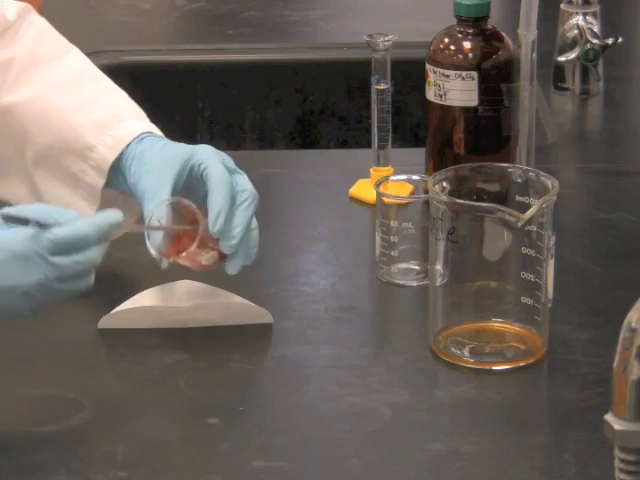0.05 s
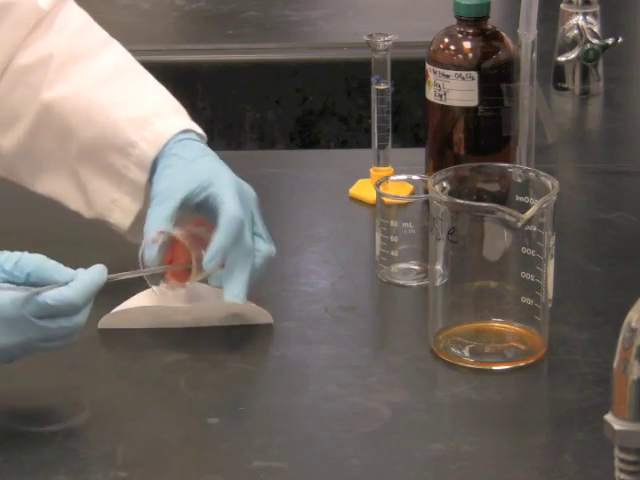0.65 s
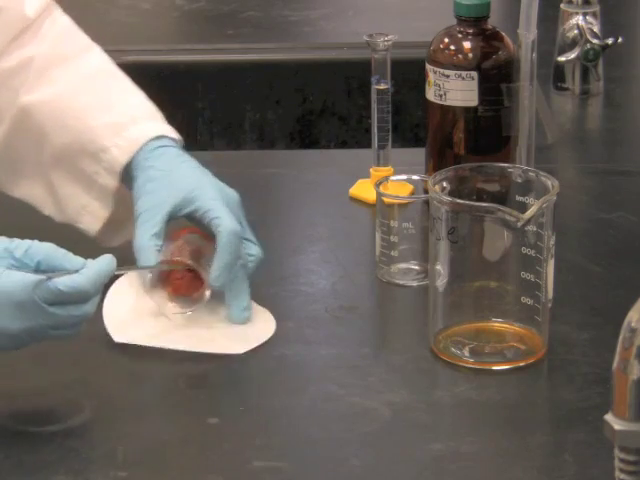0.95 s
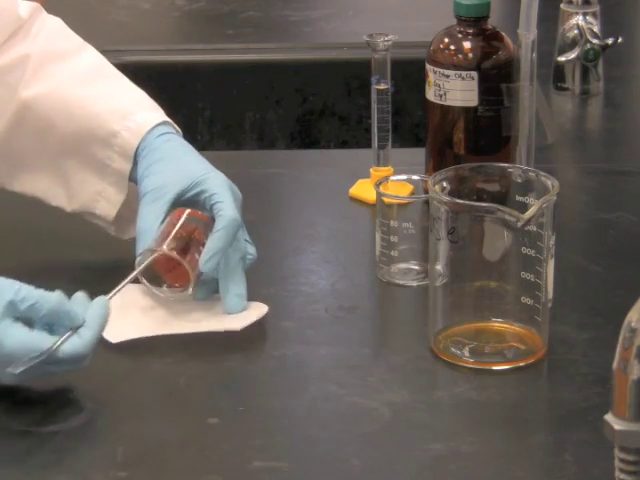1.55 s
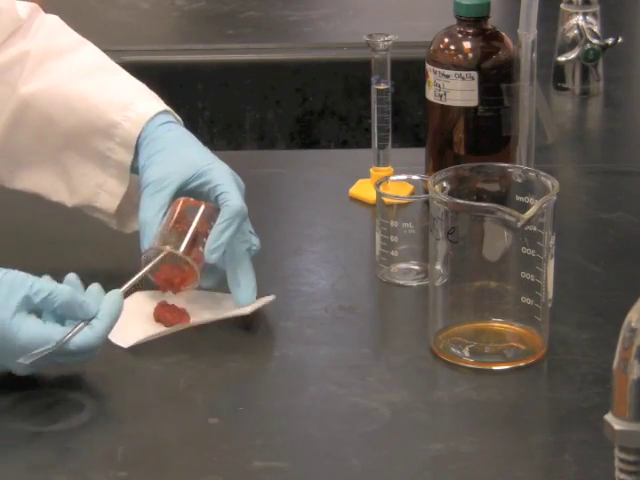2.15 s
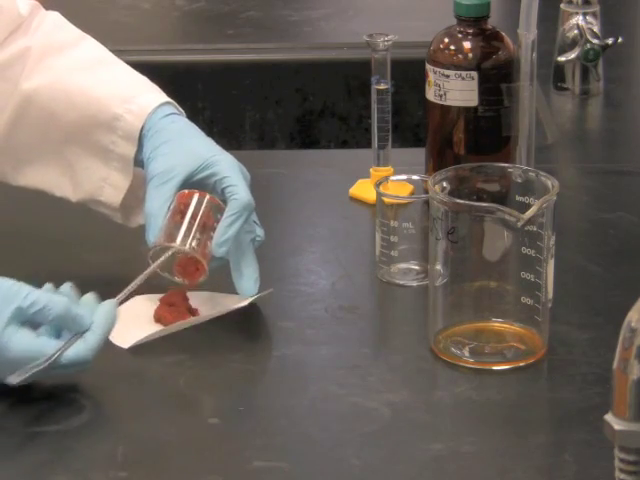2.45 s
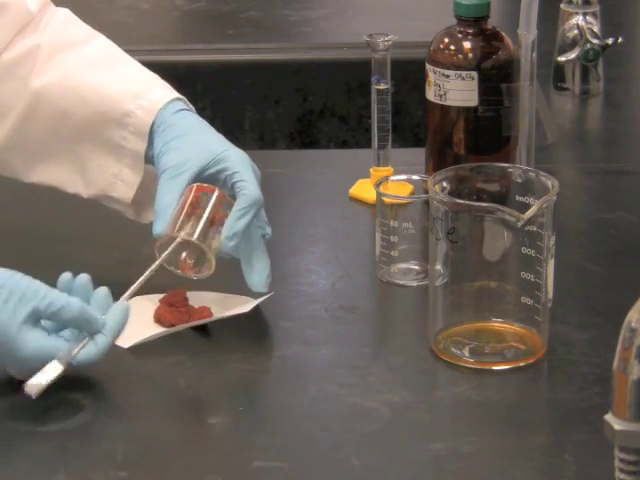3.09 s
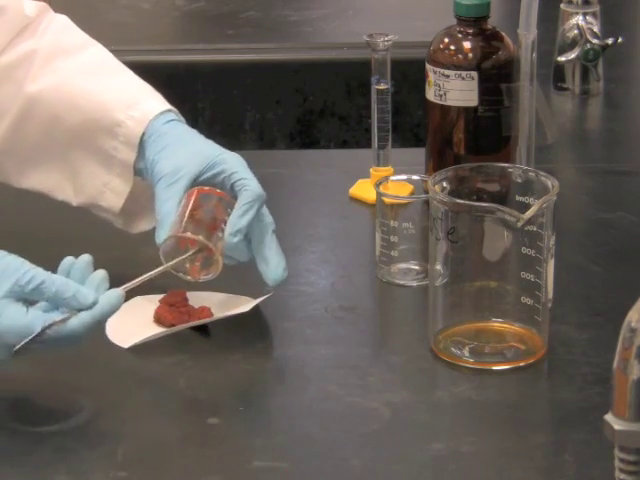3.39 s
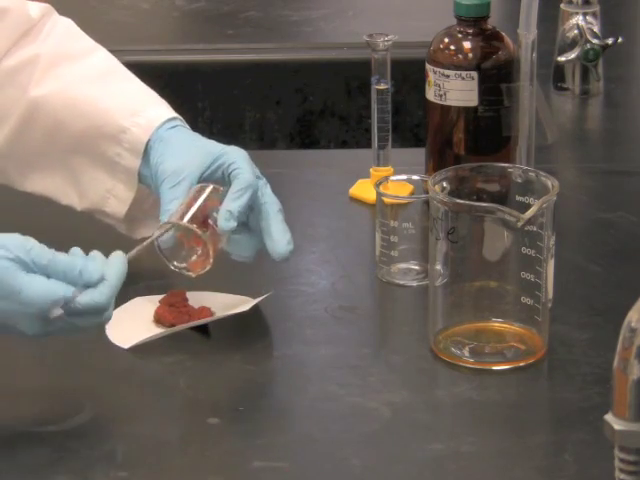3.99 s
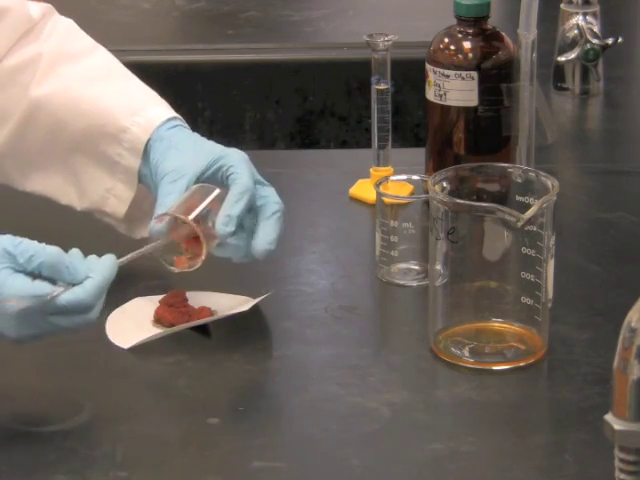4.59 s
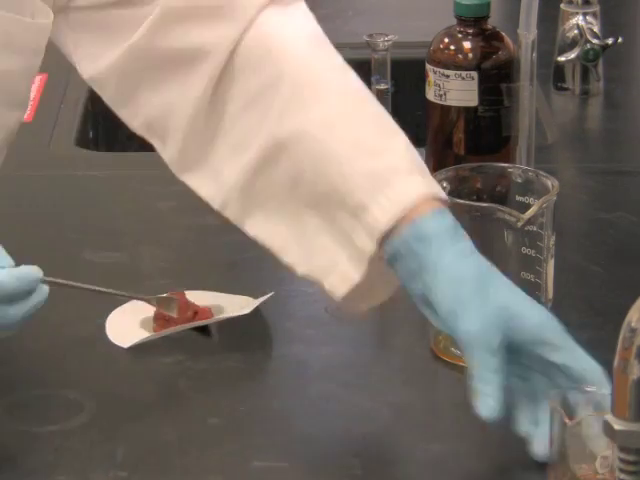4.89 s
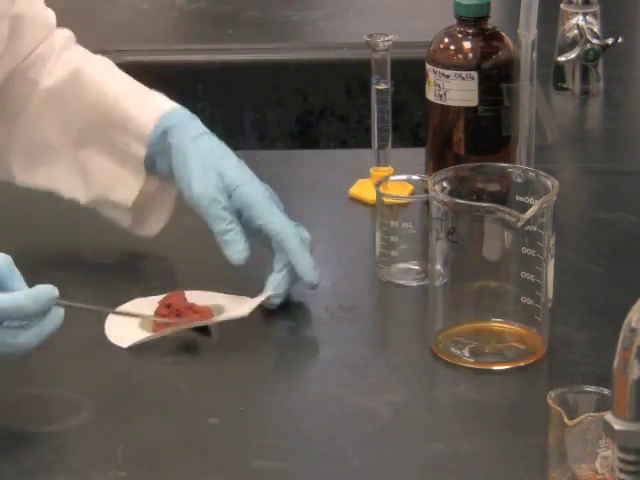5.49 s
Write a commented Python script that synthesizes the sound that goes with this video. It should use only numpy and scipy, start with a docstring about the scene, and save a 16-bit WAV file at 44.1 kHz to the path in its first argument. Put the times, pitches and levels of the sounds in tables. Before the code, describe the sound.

A steel spatula ticks and clinks against a hand-held glass beaker, close by, in a slightly echoing lab. The taps come singly and in quick pairs, high and quickly damped, with barely audible smears of paste and paper. After the sharpest clink, everything dips briefly to silence, then the beaker rings on the bench and fades. Ventilation rumbles and hums underneath throughout.

```python
"""A ventilated lab, where a steel spatula scoops paste from a small glass beaker held in a gloved hand.
Each impact excites the modes of blade and glass, which the glove damps; stick-slip friction squeaks,
and paste and weighing paper rustle faintly. The walls reverberate, and turbulent air rumbles throughout.
Near the end the level dips briefly to silence and returns on the free ring of the beaker on the bench."""
import sys
import numpy as np
from scipy import signal
from scipy.fft import rfft, irfft, next_fast_len
from scipy.io import wavfile
from scipy.ndimage import uniform_filter1d

SR = 44100
rng = np.random.default_rng(int(sys.argv[2]) if len(sys.argv) > 2 else 0)


def log_audio(samples):
    """Write samples as a 16-bit WAV file to the path given in sys.argv[1]."""
    # one column per channel
    frames = np.atleast_2d(samples).T
    # limit to full scale, then quantise
    limited = np.clip(frames, -1, 1)
    pcm = np.round(limited * 32767).astype(np.int16)
    wavfile.write(sys.argv[1], SR, pcm)


N = 244314
TIME = np.arange(N) / SR
SIDES = np.array([[1], [-1]])   # left, right
SILENT_S = 4.893   # the bottom of the dip in level


def clinks(size=16384, rise_s=0.00035, blade_build_s=0.00092):
    """Impact excitation: each touch cracks, rings blade and beaker, and favours pings set by its place."""
    # The glass rings most when touched at its rim; grip and paste shift its pitch and damp it.
    # Each row: start in seconds, crack level in dB, its extra dB at 1.5-2.5 kHz, from 13 kHz up and at
    # 4-7 kHz, blade and glass gains in dB, glass pitch in Hz, factor on the glass's ring time, and pings,
    # each with frequency in Hz, level in dB and left-right difference in dB.
    touches = [ (0.135, -43, 0, -3, 4, -47, -62, 3190, 1.0, [(7400, -46, 0), (14900, -51, 0)]),
               (1.0061, -34, 3, 1, -10, -47, -37, 3190, 0.75, [(3950, -37, 2), (8520, -30, -11),
               (11560, -31, 0), (13000, -29, -1), (15300, -35, 0)]),
               (1.03, -43, 0, 1, -6, -47, -45, 3180, 1.0, [(8560, -38, -4), (11600, -43, 0),
               (13700, -44, 1)]), (1.036, -48, 0, 0, -3, -55, -48, 3120, 1.0, [(13000, -48, 0)]),
               (1.5499, -31.5, 5, 3, -7, -48, -32.5, 3200, 0.62, [(7450, -40, 0), (8400, -38, 0),
               (9700, -37, 1), (12900, -34, 2), (13600, -34, 2), (14550, -34, 2)]),
               (1.677, -42, 0, 0, -4, -52, -45, 3140, 0.8, [(7300, -41, 0), (14500, -46, 0)]),
               (1.691, -30.5, 5, -2, -6, -36, -31, 3104, 0.98, [(3800, -45, 0), (8310, -29, -4),
               (9750, -32, -3), (11450, -36, 0), (13500, -34, 0), (15600, -36, 0)]),
               (1.9989, -24.5, 3, 4, -7, -43, -26.5, 3195, 1.08, [(5530, -27.5, 4), (8520, -24.5, -10),
               (11540, -29, 2), (13620, -25, 3), (14400, -28, 2), (15450, -30, 2)]),
               (3.0046, -34.5, 0, -4, -8, -34.5, -47, 3250, 1.0, [(6650, -39, 0), (7740, -34, 0),
               (8880, -32, 0), (9930, -25.5, 4), (10060, -32, 0), (11500, -29, -1), (13400, -32, 1),
               (15500, -38, 0)]), (3.6213, -39, 0, -8, -6, -30.5, -53, 3190, 1.0, [(4950, -47, 0),
               (8930, -24.5, -3), (9620, -35, -1), (14200, -45, 3)]),
               (3.6904, -32, 5, 6.5, -7, -53, -48, 3260, 1.0, [(5350, -43, 0), (6600, -38, 0),
               (9400, -38, -1), (13900, -31, 3), (14900, -33, 2)]),
               (4.3316, -32, -4, -3, -10, -32, -60, 3190, 1.0, [(5080, -37, 0), (6580, -31, 0),
               (7770, -29, -2), (9000, -33, 0), (10200, -24.5, 3), (11400, -26, -1), (14700, -29, 2)]),
               (4.3842, -27.5, -2, 1, -8, -40, -49, 3200, 1.0, [(5400, -22.5, -1), (9080, -26, 0),
               (13100, -30, 5), (14200, -31, 5)]),
               (4.7651, -22, -3, -3, -12, -20, -52, 3200, 1.0, [(5270, -25, 0), (5930, -26, 0),
               (6540, -24, 0), (7500, -23, -5), (7850, -23, -4), (9030, -25, 0), (9850, -21.5, 2),
               (10170, -17, 4), (11200, -19, 2), (14550, -27, 2), (15350, -30, 2)])]
    # Modes of the hand-held blade. Each row: frequency in Hz, relative level in dB, T60 in seconds.
    blade_modes = [(1369, 4, 0.066), (1285, -3, 0.046), (1246, -13, 0.05), (1030, -11, 0.035),
                   (5220, -26, 0.09), (5960, -27, .04), (8400, -22, 0.02), (8940, -15, 0.016)]
    # Modes of the gloved beaker. Each row: nominal frequency in Hz, relative dB, nominal T60 in seconds.
    glass_modes = [(3200, 3.5, 0.046), (2970, -24, 0.016), (3490, -4.5, 0.029), (3890, 1.5, 0.011),
                   (4260, -3, 0.013), (5400, -17, 0.069), (8640, -16, 0.076), (8200, -21, 0.023),
                   (11650, -12, 0.029), (13440, -10, .03), (14525, -16, .022), (15400, -18, .03)]
    out, t = np.zeros((2, N)), TIME[:size]
    for s, crack_db, clack_db, top_db, mid_db, steel_db, glass_db, glass_hz, freedom, favoured in touches:
        contact = from_db(crack_db) * crack(clack_db, mid_db, top_db, size)
        swing_up = 1 - np.exp(-t / blade_build_s)   # slow bending modes take a moment to build
        steel = from_db(steel_db) * ring(blade_modes, size, port_phase=0.3) * swing_up
        gripped = [(hz * glass_hz / glass_modes[0][0], db, t60 * freedom) for hz, db, t60 in glass_modes]
        glass = from_db(glass_db) * ring(gripped, size, port_phase=0.37)
        pings = sum(ping(hz, db, size) * panned(pan_db) for hz, db, pan_db in favoured)
        add(out, s, (contact + steel + glass + pings) * (1 - np.exp(-t / rise_s)))
    return out


def crack(clack_db, mid_db, top_db, size, t60=0.014, centred=0.34):
    """A brief hard contact has a broad spectrum, comb-filtered by interference with early reflections."""
    # Spectrum of the contact. Each row: frequency in Hz, relative level in dB.
    spectrum = [(900, -11), (2500, -8), (4300, 3), (6500, 7), (10000, -4.5), (14500, 2), (15400, -1),
                (16000, -12)]
    # Reflections off bench and glassware. Each row: mean delay in seconds, gain in dB.
    reflections = [(.0012, -4.5), (.003, -6.5)]
    shelves = [(700, 0), (1500, clack_db), (2500, clack_db), (4000, mid_db), (7000, mid_db),
               (8500, 0), (11500, 0), (13000, top_db)]
    burst = noise(lambda hz: from_db(at_hz(spectrum, hz) + at_hz(shelves, hz)), size)
    burst = rms_one(burst + centred * burst[::-1]) * decay(TIME[:size], t60)
    # The hand moves between touches, so the paths differ each time.
    echoes = sum(from_db(db) * np.roll(burst, round(s * SR * rng.uniform(.8, 1.2)), axis=1)
                 for s, db in reflections)
    return burst + echoes


def ping(hz, db, size, split=0.025, flank_db=-16.5, t60=0.021, build_s=0.0007):
    """Three closely spaced, heavily damped modes beat together as they build and die."""
    cluster = [(hz * (1 + k * split), db + abs(k) * flank_db, t60) for k in (-1, 0, 1)]
    return ring(cluster, size, port_phase=1.0) * (1 - np.exp(-TIME[:size] / build_s))


def ring(modes, size, port_phase):
    """Modal superposition: damped sines, each varying by blow in strength and in left-right phase."""
    t, out = TIME[:size], 0
    for hz, db, t60 in modes:
        strength_db, skew = rng.uniform(-1.13, 1, 2)
        phase = 2 * np.pi * hz * t + port_phase * skew * SIDES
        out = out + from_db(db + strength_db) * decay(t, t60) * np.sin(phase)
    return out


def beaker_set_down(start_s=4.894, size=32768, wash_db=-29, wash_t60=0.54, ring_db=2.5):
    """Free vibration: without the glove's damping the glass rings long, while its knock reverberates."""
    # Modes of the beaker on the bench. Each row: frequency in Hz, relative level in dB, T60 in seconds.
    free_modes = [(3316, -20, 0.25), (3320, -34.5, 0.56), (3256, -29, 0.35), (1360, -42, 0.76),
                  (1290, -41, 0.4), (8872, -51, 0.39)]
    # Spectrum of the knock dying away in the room. Each row: frequency in Hz, relative level in dB.
    wash_spectrum = [(700, -15), (1350, 7.5), (2000, -4.5), (3300, -2.5), (5300, -3.5), (6700, -7.5),
                     (7700, -17), (9000, -6), (9800, -25), (15000, -38)]
    out = np.zeros((2, N))
    wash = from_db(wash_db) * coloured(wash_spectrum, 0, size) * decay(TIME[:size], wash_t60)
    glass = from_db(ring_db) * ring(free_modes, size, port_phase=0.75) * panned(db=4.0)
    add(out, start_s, wash + glass)
    return out


def squeaks(size=4096, waver=0.017, judder_db=3):
    """Stick-slip friction: steel on wet glass sings a tone and its octave, gliding as pressure changes."""
    # Each row: start and length in seconds, first and last pitch in Hz, level in dB, octave's relative dB.
    slips = [(0.132, 0.024, 1480, 1526, -37, -34), (0.2, 0.022, 1540, 1520, -43.5, -32),
             (0.199, 0.035, 6100, 6090, -44.5, -6), (0.202, 0.019, 6600, 6580, -44.5, -11),
             (0.203, 0.02, 7200, 7200, -59, -3), (0.213, 0.026, 4780, 4790, -53, -24),
             (3.097, 0.018, 9850, 10250, -56, -30), (3.118, 0.012, 8870, 8750, -48.5, -30)]
    out, t = np.zeros((2, N)), TIME[:size]
    for s, length, start_hz, end_hz, db, octave_db in slips:
        wobble, grip = rms_one(uniform_filter1d(rng.standard_normal((2, size)), size=60))
        hz = np.interp(t, [0, length], [start_hz, end_hz])
        phase = 2 * np.pi * np.cumsum(hz * (1 + waver * wobble)) / SR
        tone = np.sin(phase) + from_db(octave_db) * np.sin(2 * phase)
        add(out, s, from_db(db + judder_db * grip) * stroke(t, length) * tone)
    return out


def rustles(size=16384, clump_db=3, tilt_db_per_octave=8):
    """Friction noise: smearing paste and shifting paper hiss in clumps of a millisecond or two."""
    # Each row: start in seconds, length in seconds, level in dB.
    smears = [(0.2, 0.033, -53), (0.819, 0.21, -61), (2.503, .035, -58), (3.986, 0.034, -59),
              (4.474, .02, -53)]
    # Friction spectrum before the tilt. Each row: frequency in Hz, relative level in dB.
    spectrum = [(1500, -27), (3000, -19), (5000, 14), (9000, -7), (15000, -13)]
    out, t = np.zeros((2, N)), TIME[:size]
    for s, length, db in smears:
        roughness = rms_one(uniform_filter1d(rng.standard_normal(size), size=70))
        hiss = from_db(clump_db * roughness) * coloured(spectrum, tilt_db_per_octave, size)
        add(out, s, from_db(db) * stroke(t, length) * rms_one(hiss))
    return out


def wall_echo(dry, delay_s=0.0136):
    """Specular reflection: a wall returns one delayed copy, plainer early on while the beaker is low."""
    # Each row: time in seconds, gain of the reflection in dB.
    strength = [(2, -8), (3, -25)]
    out = np.zeros((2, N))
    add(out, delay_s, from_db(np.interp(TIME, *np.transpose(strength))) * dry)
    return out


def reverberation(dry, size=24000, level_db=-8.5, build_s=0.0016):
    """Repeated reflection between hard walls builds a diffuse field whose treble dies first."""
    # Each row: frequency in Hz, reverberation time in seconds.
    room_t60 = [(1000, 0.57), (3200, 0.55), (5500, 0.46), (9000, 0.41), (15000, 0.32)]
    t, tail = TIME[:size], 0
    edges_hz = np.geomspace(700, 18000, 8)
    for low, high in zip(edges_hz, edges_hz[1:]):
        band_pass = signal.butter(2, [low, high], "band", fs=SR, output="sos")
        band = signal.sosfilt(band_pass, noise(np.ones_like, size))
        tail = tail + band * decay(t, at_hz(room_t60, np.sqrt(low * high)))
    response = rms_one(tail * (1 - np.exp(-t / build_s))) / np.sqrt(size)
    return from_db(level_db) * signal.fftconvolve(dry, response, axes=1)[:, :N]


def fan_tones(size):
    """Resonance: turbulence drives narrow fan and duct modes, heard as wavering tones."""
    # Each row: centre frequency in Hz, width in Hz, level in dB.
    resonances = [(27.6, 3, -49), (59.5, 4.2, -41.5), (68.2, 4.7, -44.5), (119.5, 6.9, -38.5),
                  (256.3, 2.5, -52), (280.2, 19.5, -35), (369, 20, -43.5), (417.7, 11, -38.5),
                  (637, 8.6, -49), (813, 1.5, -53), (921, 13, -57.5), (1081, 6.3, -54), (576, 17, -68),
                  (748, 22, -52)]

    def gain_at(hz):
        return np.sqrt(sum(from_db(db) ** 2 / width / (1 + ((hz - centre) / width) ** 2) ** 2
                           for centre, width, db in resonances))
    total_rms = np.sqrt(sum(from_db(db) ** 2 for centre, width, db in resonances))
    return total_rms * noise(gain_at, size)


def ventilation(air_db=-30.5, rumble_top_hz=78.5, swell_db=0.5, swells_per_s=2.6):
    """Turbulent flow spreads broadband noise under the fan tones; its rumble swells and sinks at random."""
    # Spectrum of the air noise. Each row: frequency in Hz, relative spectral density in dB.
    spectrum = [(12, -51), (20, -39), (55, -3.5), (123, -3), (154, -5), (277, -5), (328, -11), (410, -9.5),
                (499, -15), (624, -14.5), (897, -21), (1120, -20.5), (1570, -28), (5080, -42),
                (16000, -59.5)]
    size = next_fast_len(N)
    air = (from_db(air_db) * coloured(spectrum, 0, size) + fan_tones(size))[:, :N]
    rumble = signal.sosfiltfilt(signal.butter(2, rumble_top_hz, fs=SR, output="sos"), air)
    return air + rumble * (from_db(swell_db * drift(swells_per_s)) - 1)


def noise(gain_at, size):
    """Spatial coherence: shaped stereo noise of unit rms, alike on both sides at long wavelengths."""
    # Each row: frequency in Hz, left-right coherence from 0 to 1.
    coherence = [(60, .99), (250, .99), (420, .96), (700, .91), (1200, .74), (2200, .45), (4000, .2),
                 (7000, .05)]
    # Each row: frequency in Hz, phase lag of the left side in radians.
    left_lag = [(30, 1.5), (60, 1.1), (120, .73), (250, .4), (700, .13), (1200, .02)]
    # Each row: frequency in Hz, left-right level difference in dB.
    balance = [(30, 1), (60, 5), (125, 2.5), (250, 0.7), (600, -0.2), (1100, -1.7), (2200, 1), (12000, 0)]
    hz = np.fft.rfftfreq(size, 1 / SR)
    mid, side = rfft(rng.standard_normal((2, size)))
    alike = np.clip(at_hz(coherence, hz), 0, 1)
    pair = np.sqrt(1 + alike) * mid + np.sqrt(1 - alike) * side * SIDES
    pair *= np.exp(-.5j * SIDES * at_hz(left_lag, hz))
    return rms_one(irfft(pair * gain_at(hz) * panned(at_hz(balance, hz)), size))


def coloured(spectrum, tilt_db_per_octave, size):
    """Spectral shaping: noise follows a spectrum, tilted upward from its first frequency."""
    def gain_at(hz):
        octaves = np.log2(np.maximum(hz / spectrum[0][0], 1))
        return from_db(at_hz(spectrum, hz) + tilt_db_per_octave * octaves)
    return noise(gain_at, size)


def decay(t, t60):
    """Exponential damping: a fall of 60 dB in t60 seconds."""
    return np.exp(-np.log(1000) * t / t60)


def stroke(t, length):
    """Amplitude envelope: a rounded swell of the given length."""
    return np.sqrt(np.abs(np.sin(np.pi * np.clip(t / length, 0, 1))))


def drift(turns_per_s):
    """Slow random modulation with a spread of about 1."""
    turns = rng.standard_normal(256)
    return np.interp(TIME * turns_per_s, np.arange(len(turns)), turns)


def from_db(db):
    """Decibels to amplitude ratio."""
    return 10 ** (np.asarray(db) / 20)


def rms_one(x):
    """Normalisation to unit rms."""
    return x / np.sqrt(np.mean(x ** 2) + 1e-20)


def at_hz(points, hz):
    """Interpolation of a table along log frequency."""
    knots, values = np.transpose(points)
    return np.interp(np.log(hz + 1e-3), np.log(knots), values)


def panned(db):
    """Left and right gains for a level difference."""
    return from_db(SIDES * db / 2)


def add(out, s, sound):
    """Superposition: mix a sound in from s seconds."""
    start = max(round(s * SR), 0)
    out[:, start:start + sound.shape[-1]] += sound[..., :N - start]


def scene():
    """Sources superpose: handwork and its echoes until the dip, then the beaker, over the ventilation."""
    handwork = clinks() + squeaks() + rustles()
    in_room = handwork + reverberation(handwork) + wall_echo(handwork)
    return in_room * (TIME < SILENT_S) + beaker_set_down() + ventilation()


def record(dry, fade_out_s=.095, fade_in_s=.09, fade_shape=1.14, low_hz=22, top_hz=15900):
    """Band limiting cuts the lowest rumble and the top; the level dips briefly to silence."""
    falling = (SILENT_S - TIME) / fade_out_s
    rising = (TIME - SILENT_S) / fade_in_s
    fade = np.clip(np.maximum(falling, rising), 0, 1) ** fade_shape
    low_cut = signal.butter(4, low_hz, "high", fs=SR, output="sos")
    top_cut = signal.ellip(10, .2, 80, top_hz, fs=SR, output="sos")
    return signal.sosfilt(top_cut, signal.sosfilt(low_cut, dry) * fade)


dry = scene()
out = record(dry)
log_audio(out)
```